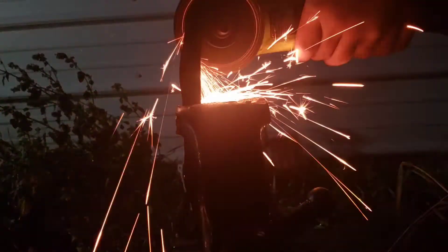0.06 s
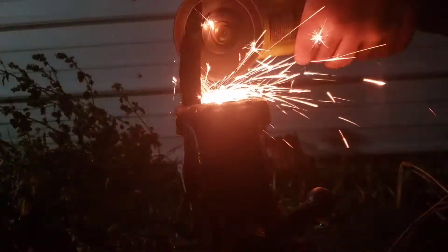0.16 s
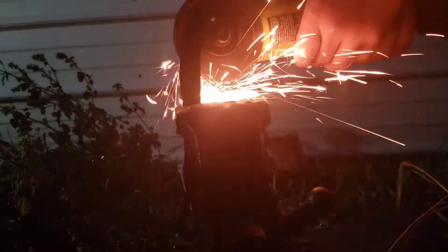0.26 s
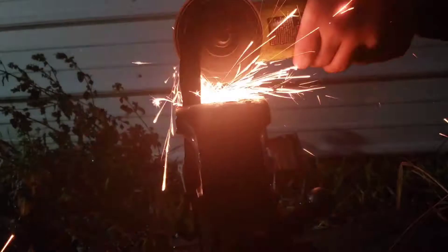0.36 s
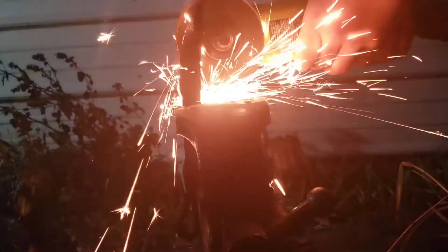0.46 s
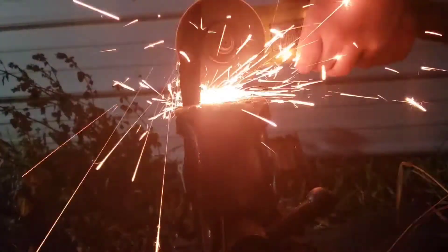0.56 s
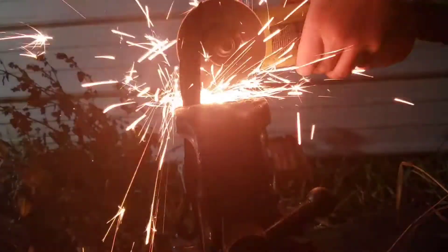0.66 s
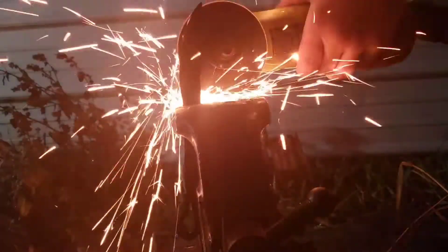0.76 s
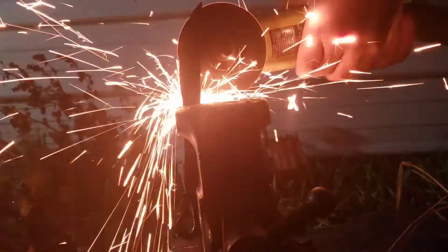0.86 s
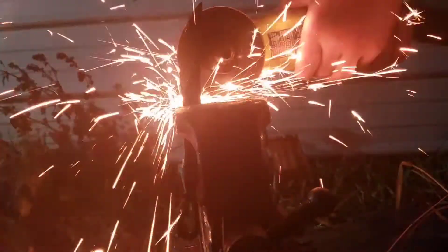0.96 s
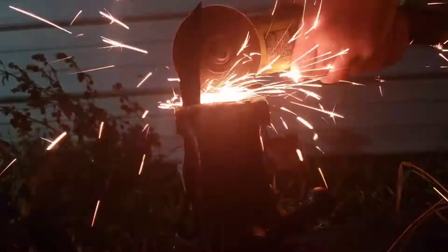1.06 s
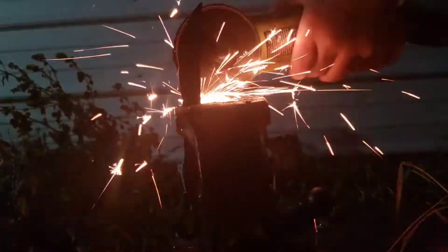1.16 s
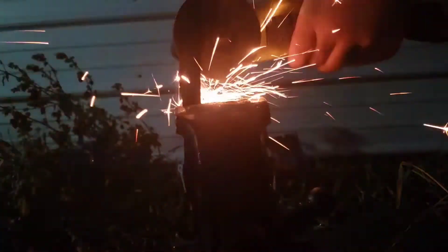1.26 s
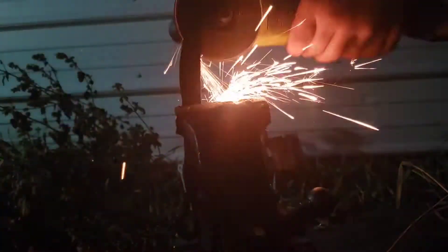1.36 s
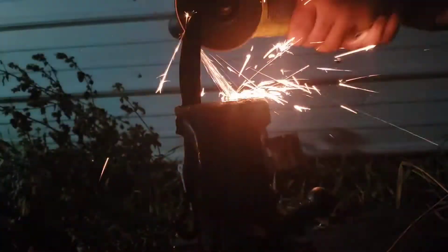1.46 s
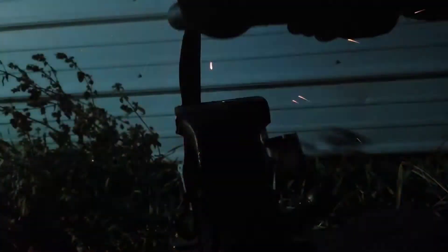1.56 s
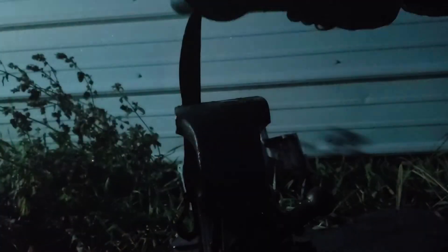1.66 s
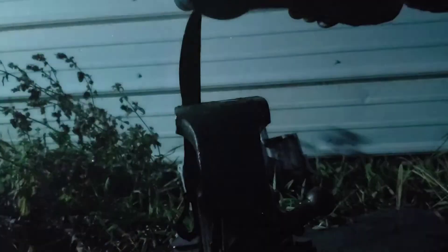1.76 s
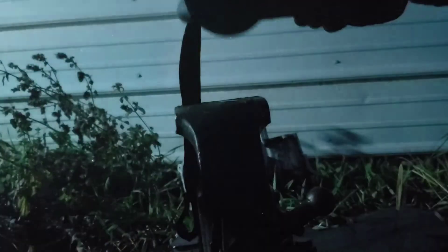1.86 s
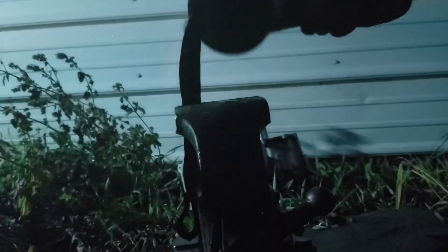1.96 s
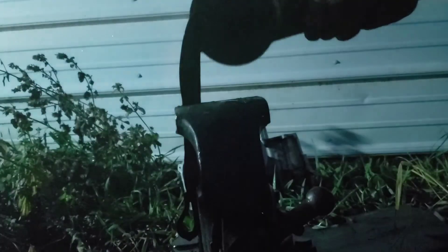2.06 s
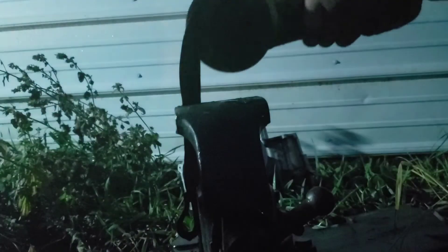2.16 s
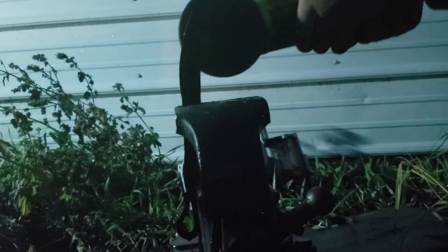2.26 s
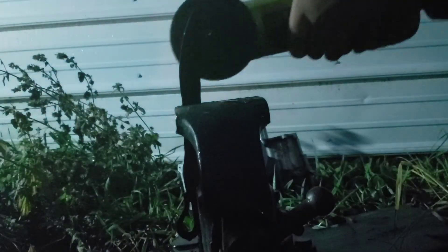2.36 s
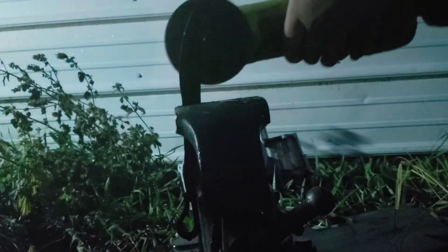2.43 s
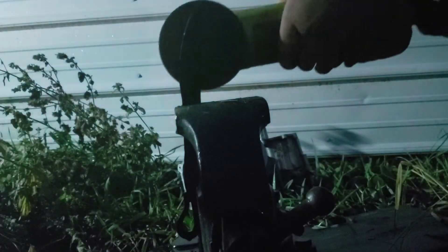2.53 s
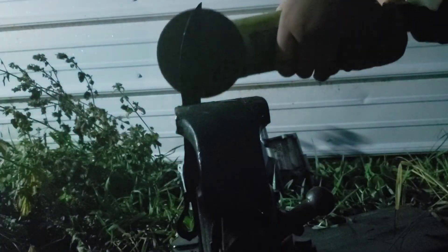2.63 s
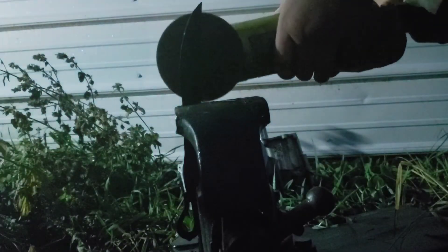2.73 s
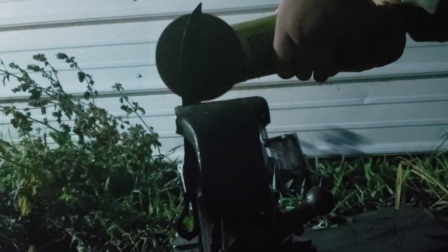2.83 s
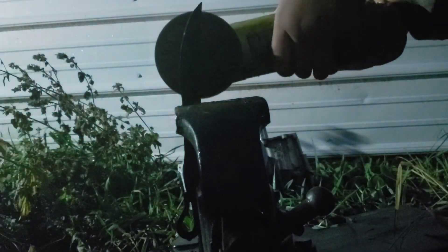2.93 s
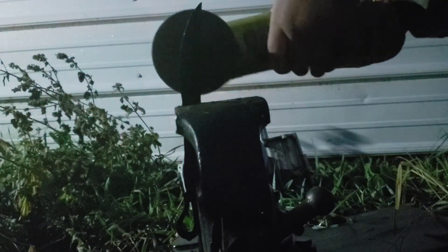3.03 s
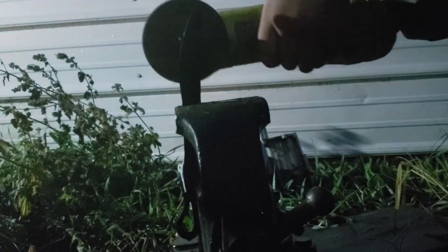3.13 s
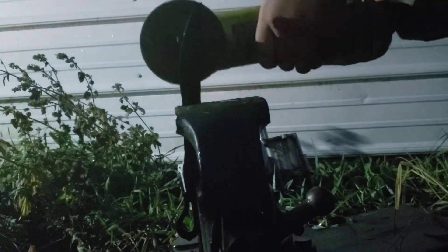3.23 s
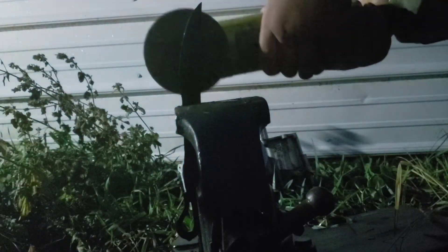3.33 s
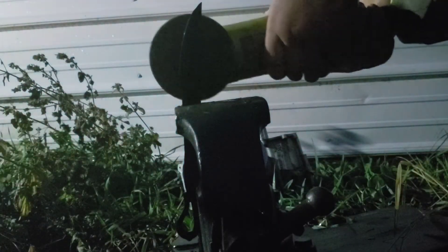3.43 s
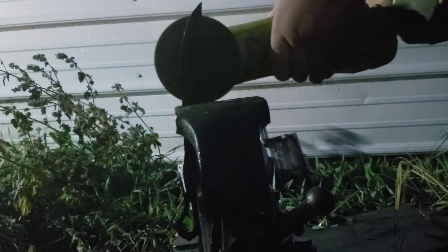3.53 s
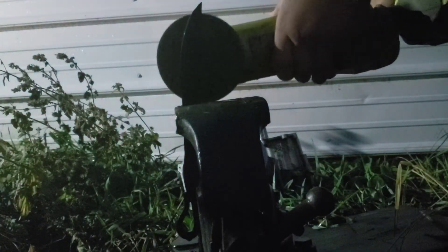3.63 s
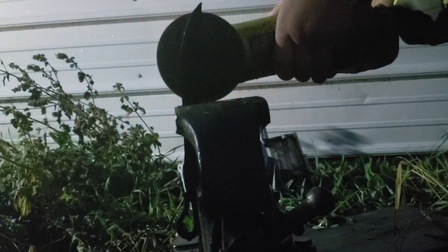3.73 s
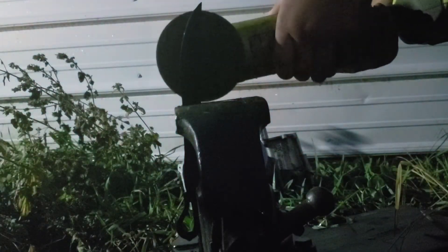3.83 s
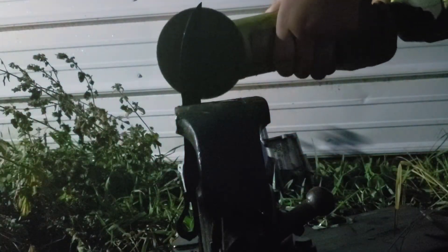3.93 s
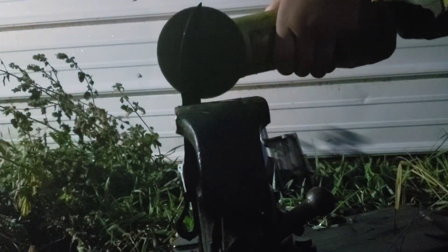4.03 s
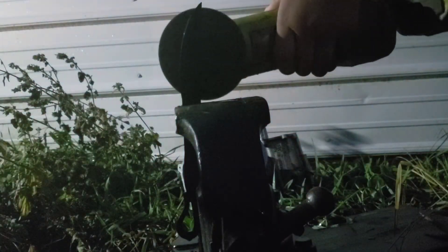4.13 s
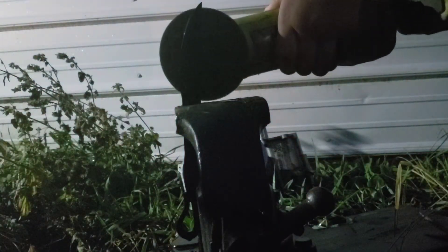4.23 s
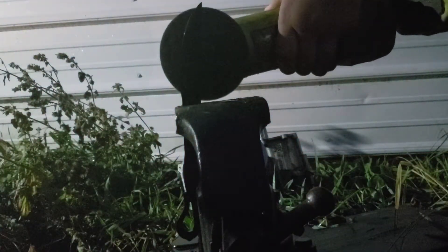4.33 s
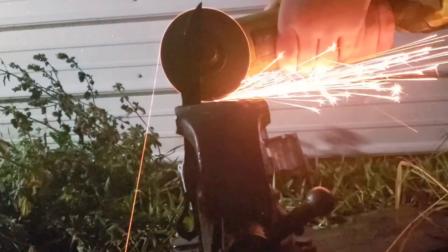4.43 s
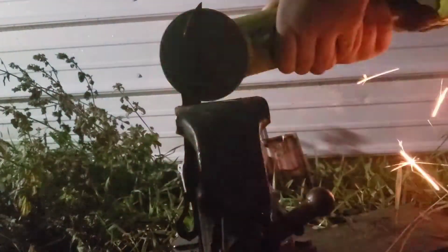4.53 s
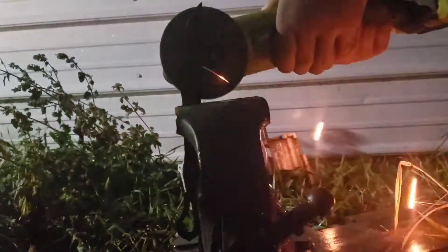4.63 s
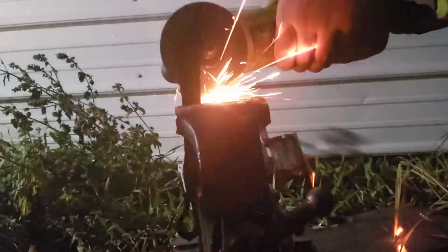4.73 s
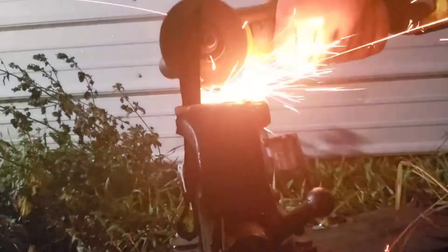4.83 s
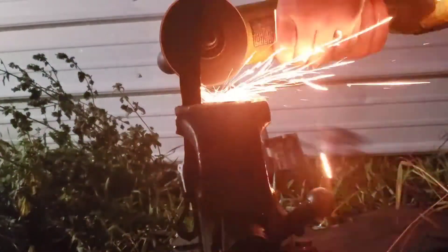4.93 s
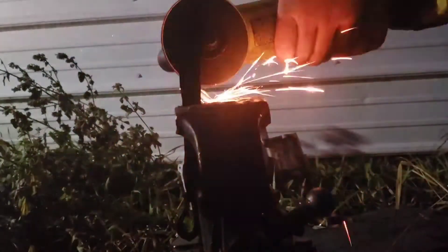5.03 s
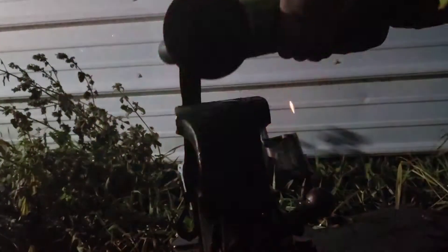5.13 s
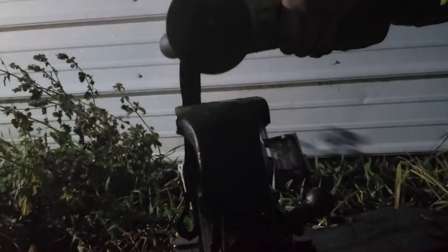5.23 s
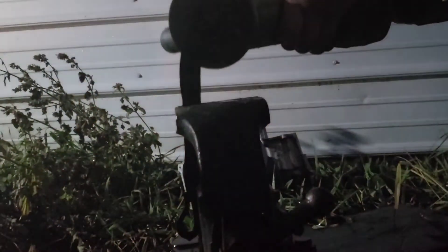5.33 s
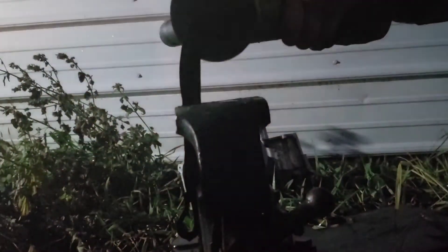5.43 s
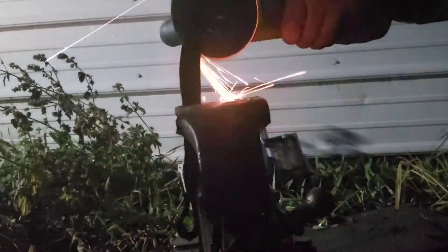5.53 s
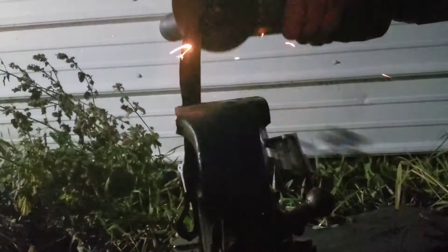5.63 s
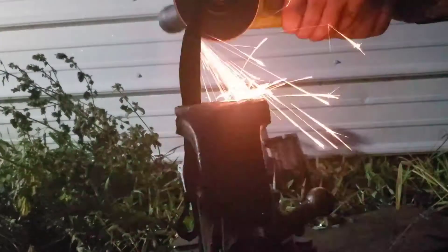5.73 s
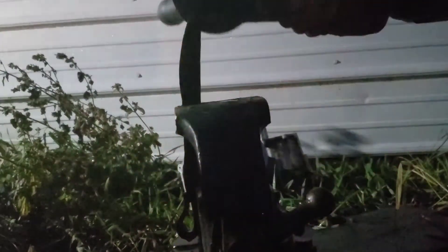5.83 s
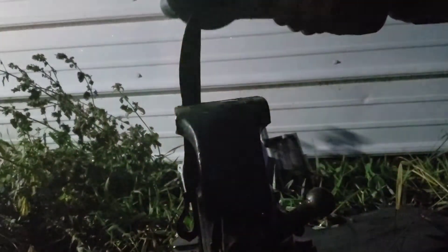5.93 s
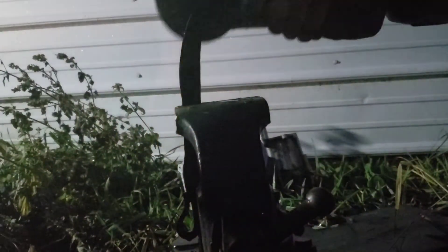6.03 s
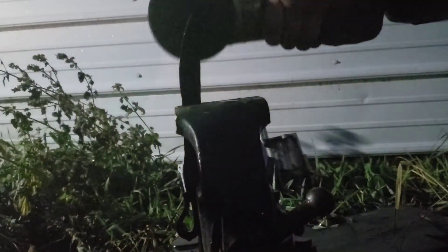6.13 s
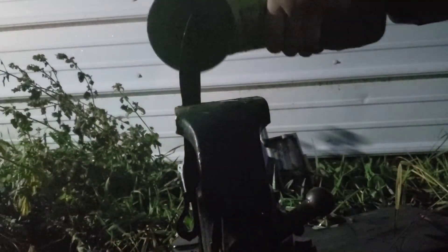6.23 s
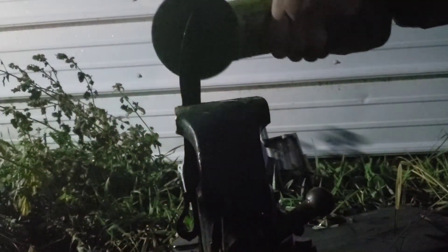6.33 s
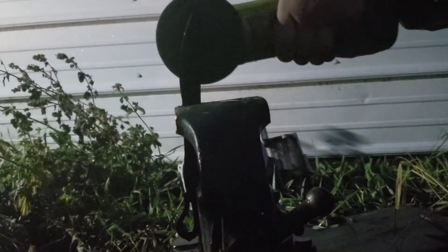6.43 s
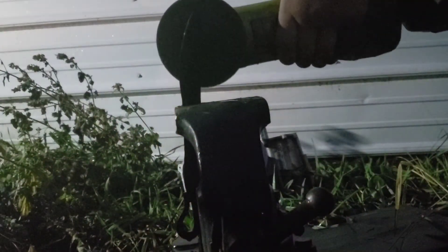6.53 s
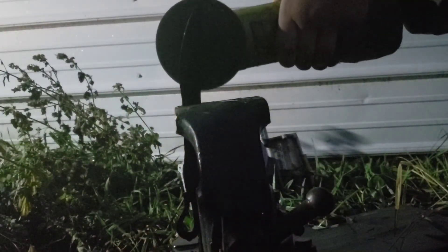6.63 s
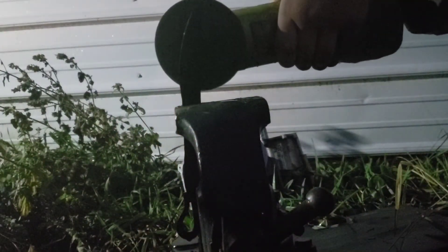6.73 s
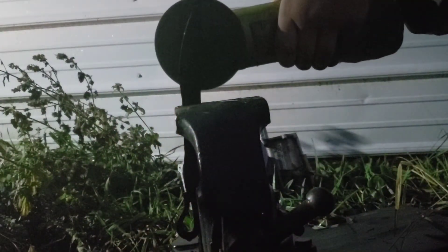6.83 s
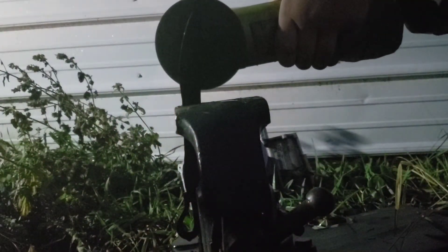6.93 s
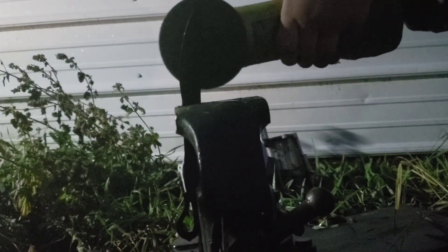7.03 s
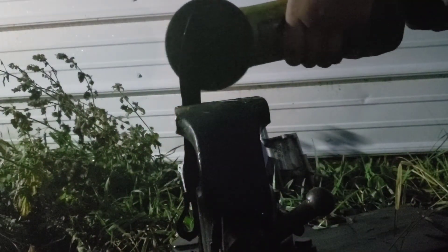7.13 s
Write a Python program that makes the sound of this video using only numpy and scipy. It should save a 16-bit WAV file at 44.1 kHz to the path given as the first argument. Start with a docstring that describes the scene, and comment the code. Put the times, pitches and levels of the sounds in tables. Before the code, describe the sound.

From the very start an angle grinder presses on a clamped steel blade, close by outdoors: a loud, bright, sizzling scrape with gritty fluttering at the disc's fast rotation. From about 0.4 to 1.0 seconds a strained metallic squeal with a lower hum locks in; a rough grab follows, then more scraping and a fainter squeal near 1.4. Contact ends around 1.6. Switched off at 1.7, the motor winds down in a rattling whir with scattered dry gear clacks. At 3.06 it surges quickly back to speed. Low rumble and airy whir swell most around 4.2. Isolated knocks from 3.7 become rough, rapid ringing chatter by 4.3 to 4.7. A second, throbbing grind bites until 5.1, thins into sliding, hissing scrapes, and ends with brief dabs near 5.8. The tool runs free, with two clacks near 6.3, a small knock at 6.6 and faint grazing around 6.7 to 7.1.

```python
"""A harsh, sizzling scrape comes first: an angle grinder's disc bites a steel blade in a vise, outdoors.
Noise shaped by the steel's resonances makes the scrape; grit on the rim repeats part of it each turn.
The disc squeals, lifts, coasts with rattling, clacking gears and is switched on again. It skips and
knocks on the blade, bites again, runs free and grazes the edge. Tones in step with the disc make
squeal and whine; noise makes air, gears, knocks and the low rumble that swells and ebbs beneath."""
import sys
import numpy as np
from scipy import signal
from scipy.fft import rfft, irfft, next_fast_len
from scipy.io import wavfile
from scipy.ndimage import uniform_filter1d, map_coordinates

SR = 44100
rng = np.random.default_rng(int(sys.argv[2]) if len(sys.argv) > 2 else 0)


def file_out(sig):
    """Save sig as 16-bit WAV at sys.argv[1]."""
    # one column per channel
    cols = np.atleast_2d(sig).T
    # limit, then scale
    lim = np.clip(cols, -1, 1)
    pcm = np.round(lim * 32767).astype(np.int16)
    wavfile.write(sys.argv[1], SR, pcm)


N = 317079

# Disc speed under power, dragged down by the load: time_s, turns_per_s
DRIVEN_SPEED = [(0, 86.4), (.2, 86.9), (.95, 86.15), (1.1, 85.3), (1.33, 87.3), (1.45, 87.6), (1.56, 88.8),
                (1.63, 93.2), (3.6, 95), (4.15, 95), (4.72, 92), (4.9, 89.3), (5.1, 89.6), (5.35, 93),
                (5.6, 91.4), (5.95, 94.3), (7.19, 95)]
FREE_SPEED_HZ = 95  # disc turns a second without load
OFF_S, ON_S = 1.72, 3.058  # the switch
# air drag halves the speed in the first time; the other two are fade times of speed gap and strain
COAST_HALF_S, SPIN_UP_S, STRAIN_S = .71, .115, 0.18

# The two firm strokes, levels before the 1 dB cut on both strokes: time_s, sizzle_db, bite_db
FIRST_STROKE = [(0.0, -20.5, -37.5), (0.08, -22.5, -34.5), (0.212, -18.5, -34.5), (0.28, -22.5, -33.5),
                (0.418, -23.5, -33), (0.516, -26.5, -33), (0.948, -26, -30.5), (0.984, -20.5, -30),
                (1.206, -25.5, -34.5), (1.478, -20, -35.5), (1.554, -25.5, -39.5), (1.6, -49, -60)]
SECOND_STROKE = [(4.725, -26, -29.5), (4.8, -25, -28), (4.882, -21, -27.5), (5.01, -26, -29.5),
                 (5.14, -31, -41.5), (5.36, -30, -42), (5.43, -26, -41), (5.52, -29, -45.5),
                 (5.64, -32, -43.5), (5.72, -36, -49), (5.82, -45, -49)]
# Dabs on the edge as the disc lifts away, before the same cut: start_s, end_s, sizzle_db, bite_db
DABS = [(5.56, 5.6, -31, -34), (5.752, 5.774, -27.5, -34)]
DAB_ATTACK_S, DAB_RELEASE_S = 0.031, 0.025
# Broad colour of each stroke's scrape: pitch_hz, level_db
FIRST_TONE = [(350, -66), (600, -39), (930, -19), (1110, -25), (1280, -16), (1600, -26), (2250, -14.5),
              (2830, -18), (4520, -8.5), (5800, -12), (7020, -16), (8050, -10.5), (9760, -11.5),
              (11200, -6.5), (15100, 0), (16000, -3.5)]
SECOND_TONE = [(710, -27), (1200, -19.5), (1380, -11.5), (1700, -19.5), (2110, -15.5), (3660, -11),
               (4000, -6), (6030, -8.5), (6950, -12.5), (7410, -11.5), (10400, -6), (11400, -1),
               (14000, -5), (14800, 2), (16000, -10)]
# Resonances of blade and disc in each stroke: pitch_hz, width_hz, lift_db
FIRST_MODES = [(960, 120, -1), (2140, 210, 6), (3090, 64, 6.5), (4280, 110, 5.5), (7990, 450, 6),
               (11460, 240, 7.5), (12750, 680, 1), (15200, 250, 5.5), (15900, 200, 6)]
SECOND_MODES = [(2020, 170, 6.2), (4080, 100, 4.3), (4830, 180, 7.3), (6770, 250, 4.7), (8300, 500, 4.1),
                (11200, 450, 4.8), (15000, 300, 6.9)]
# Resonances that slide as the contact moves: start_s, end_s, from_hz, to_hz, width_hz, lift_db
STEEL_SLIDES = [(.05, .42, 15000, 15100, 690, 4), (.4, 1.0, 13000, 12700, 1200, 3),
                (1.034, 1.255, 6400, 6500, 700, 6), (5.09, 5.37, 8400, 7900, 600, 12),
                (5.22, 5.42, 15200, 15200, 500, 2), (5.376, 5.557, 11600, 12200, 600, 4),
                (5.4, 5.54, 15000, 14200, 500, -1), (5.56, 5.73, 4560, 4000, 400, 7),
                (5.58, 5.71, 10900, 10600, 500, 7), (5.62, 5.753, 14700, 12600, 700, 13)]
EDGE_DB, EDGE_DAMPED_DB = -6, -6.5  # middle band: offset from mean of bite and sizzle; change in full squeal
FIRM_BITE_DB = -36
STEADY_SHARE, SQUEAL_SHARE = 0.38, 0.14  # part repeating each turn in a firm bite; extra in a full squeal

# Machine loudness as it swells and ebbs: time_s, level_db
MACHINE_SWELL = [(0, -43.5), (1.8, -40), (2.9, -37), (3.5, -34.5), (4.2, -24.5), (4.55, -26), (4.9, -34.5),
                 (5.9, -38), (6.6, -36.5), (7.19, -34)]
# Noises of the machine, one row each: level_db relative to its swell, power of speed, strain_db extra
AIR_LAW = (-12, 1.2, 9.7)
GEAR_LAW = (-9.5, 0.93, 11.2)
HISS_LAW = (-14, 1.82, 3.2)
WHINE_LAW = (-28, 4, 0)
# Colours of cooling air, gears and hiss: pitch_hz, level_db
AIR_TONE = [(250, -28), (430, -24), (464, -11), (550, -9.5), (601, -9), (817, 1.5), (887, 0), (1000, -1),
            (1330, -2.5), (1760, -13.5), (2200, -15), (2860, -44), (4840, -120)]
GEAR_TONE = [(1000, -36), (1700, -12.5), (2480, -4), (2980, -4.5), (4060, -4.5), (4390, -3), (4720, -4.5),
             (5140, -4), (5550, -9), (6110, -15), (6500, -13.5), (8450, -31), (14300, -120)]
HISS_TONE = [(3240, -33), (5500, -18), (7130, -5), (8410, -1), (10700, -7), (11900, -3), (13900, -5),
             (15100, 1.5), (16000, -10)]
# Resonances of the machine's noise that slide in pitch at set times:
# start_s, end_s, from_hz, to_hz, width_hz, lift_db
MACHINE_SLIDES = [(1.948, 3.0, 4250, 4870, 450, 4.5), (2.0, 3.112, 736, 765, 150, 6.6),
                  (2.8, 3.49, 4440, 4400, 400, 7.3), (3.037, 3.345, 2100, 2500, 350, 5.1)]

# Slow swell of the rumble: time_s, level_db
RUMBLE_SWELL = [(0, -38), (.3, -41), (1.8, -40.5), (2.6, -40), (3.0, -33), (3.85, -32), (4.1, -25),
                (4.4, -26.5), (4.7, -28), (4.8, -37.5), (5.9, -37.5), (6.7, -36.5), (7.19, -33)]
# Colour of the rumble: pitch_hz, level_db
RUMBLE_TONE = [(13, -58), (22, -27), (59, -18), (83, -4.5), (114, 1.5), (183, -4.5), (231, 1), (365, -9),
               (437, -25.5), (508, -25), (552, -19.5), (600, -26.5), (780, -41), (1320, -120)]

# Times when disc and blade lock together: start_s, end_s, squeal_db, hum_db
SQUEALS = [(.53, 0.954, -34.5, -45), (1.305, 1.486, -50, -46.5)]
# Tones of the squeal and of the hum below it: multiple of disc speed, level_db
SQUEAL_LINES = [(23, -13), (25, -.3), (28, -13), (30, -8), (45, -10), (48, 2), (49, -9), (53, -7), (54, -4),
                (56, -10)]
HUM_LINES = [(8, -11), (9, -9), (10, -5), (11, 1), (14, -4), (16, -3), (17, -7)]
SQUEAL_ATTACK_S, SQUEAL_RELEASE_S = 0.16, 0.11

# Brief rough grabs and loose, chattering touches:
# start_s, end_s, scrape_db, blade_ring_db, rim_zing_db, body_db
GRAZES = [(1.01, 1.034, -48, -52, -39, -38.5), (4.006, 4.215, -53, -53, -52, -46),
          (4.269, 4.422, -29.5, -46, -30, -36), (4.45, 4.72, -31, -36, -37, -37),
          (6.68, 7.12, -54, -58, -48, -59), (6.896, 7.01, -54, -46, -44, -58)]
GRAZE_ATTACK_S, GRAZE_RELEASE_S = 0.032, 0.061
# Knocks of disc on blade: time_s, scrape_db, then relative to it blade_ring_db, body_db
KNOCKS = [(3.6628, -33, -14, 6), (3.828, -23.5, -6, -0.5), (4.0043, -39.5, 11, -1),
          (4.2363, -17.5, -17, -12), (4.298, -33, -8, 1), (4.4079, -26, -3, -18), (4.4358, -26, 11, -19),
          (4.4563, -24, 1, -23), (4.4817, -27, 3, -21), (4.5024, -22, -4, -8), (6.5894, -39.5, -9, -2)]
KNOCK_ZING_DB = 4  # rim zing in every knock, relative to its scrape
BOUNCE_FROM_S, BOUNCE_TO_S = 4.489, 4.715
# scrape, then ring and body relative to it, and the random spread of scrape and ring
BOUNCE_DB, BOUNCE_RING_DB, BOUNCE_BODY_DB, BOUNCE_SCATTER_DB = -22.5, 4.5, -17, 1.5
# Colours of grazing scrape, blade ring, rim zing and knock body: pitch_hz, level_db
GRAZE_TONE = [(1000, -34), (4500, -4.5), (6200, -3.5), (7100, -12), (8300, -2), (9500, -6.5), (11000, -6.5),
              (12600, -11), (14000, -3), (15800, -14.5)]
RING_TONE = [(9500, -55), (10900, -33), (11230, 10), (11650, 0), (12100, -9), (14000, -50)]
ZING_TONE = [(11000, -21), (13500, -11), (14050, -7), (14300, -4), (14600, -8), (15040, 3), (15350, -10),
             (15800, -7.5)]
KNOCK_TONE = [(400, -18), (900, -2.5), (2200, -3), (5000, -3.5), (7000, -21)]
# Resonances in the scrape of grazes and knocks: pitch_hz, width_hz, lift_db
GRAZE_MODES = [(5080, 150, 11), (6020, 82, 8), (6510, 110, 17), (7820, 370, 14), (10430, 250, 16),
               (14200, 200, 4.5), (15030, 330, 13)]

# Slack gears clack and take up the drive: time_s, peak_db
CLACKS = [(1.7254, -42), (1.8444, -35), (1.8813, -34), (2.1704, -42), (2.2174, -42), (2.247, -31.5),
          (2.2636, -35), (2.39, -36), (2.6499, -34), (2.8418, -33.5), (2.908, -34.5), (3.057, -37),
          (6.2344, -29), (6.312, -33)]
# Colour of the clacks: pitch_hz, level_db
CLACK_TONE = [(500, -12), (900, -11), (1700, -14), (4400, 5.5), (7000, -0.5), (10500, -9), (13000, 0),
              (16000, -11)]

# Likeness of left and right: pitch_hz, likeness (1 is the same, negative is opposed)
STEEL_ALIKE = [(700, 1), (2200, 1), (4500, 0.17), (8000, 0.55), (15000, 0.25)]
MACHINE_ALIKE = [(60, 0.94), (130, 0.97), (290, -0.85), (640, 0.92), (1410, 0.79), (3100, -0.16),
                 (6820, 0.68), (15000, 0.38)]
RUMBLE_ALIKE = [(30, .88), (70, 0.98), (150, 1), (400, 0.87)]
# Level of left over right; the first serves steel and rumble: pitch_hz, difference_db
STEEL_TILT = [(100, 0.5), (700, -0.8), (2400, 0.5), (4400, -3.5), (8100, -7), (11300, -2), (15000, 2)]
MACHINE_TILT = [(60, 1.5), (150, 1.0), (380, 0.5), (950, 0.5), (2380, 0.5), (5980, -7.5), (15000, 0.5)]
# How far left leads right; the second serves machine and rumble: pitch_hz, lead_radians
STEEL_LEAD = [(100, 0), (900, -.25), (2600, -.5), (4400, .9), (7000, 3), (8400, 4.5), (11700, 5),
              (14000, 4.5), (15200, 7.5)]
MACHINE_LEAD = [(100, 0.098), (600, 0.59), (2000, -.3), (4400, -0.58), (8000, -1.7)]
CEILING, TOP_HZ = .95, 15850  # peak limit before the treble cut; highest pitch kept


def amp(db):
    """Turn decibels into gain."""
    return 10 ** (np.asarray(db) / 20)


def unit(x):
    """Scale to an rms (average strength) of 1."""
    return x / np.sqrt(np.mean(x ** 2) + 1e-20)


def along(points, hz):
    """Join (pitch, value) points on a logarithmic pitch axis."""
    pitch, value = np.transpose(points)
    return np.interp(np.log(hz + 1), np.log(pitch + 1), value)


def curves(rows):
    """Give one value per sample for each column after the time."""
    times, *columns = np.transpose(rows)
    return [np.interp(np.arange(N) / SR, times, column) for column in columns]


def held(start, end, attack, release):
    """A gain that rises to 1 by the start, holds and falls after the end."""
    t = np.arange(N) / SR
    return np.clip(1 + np.minimum((t - start) / attack, (end - t) / release), 0, 1)


def during(rows):
    """1 within the times of a table, fading quickly outside."""
    return held(rows[0][0], rows[-1][0], attack=.015, release=.015)


def wobble(rate):
    """A smooth random curve with the given number of knots a second."""
    knots = rng.standard_normal(int(N * rate / SR) + 4)
    at = np.arange(0, len(knots) - 1, .125)
    smooth = map_coordinates(knots, [at])
    return np.interp(np.arange(N) * rate / SR, at, smooth)


def noise():
    """Two unrelated white noises: direct and scattered sound."""
    return rng.standard_normal((2, N))


def filtered(x, response):
    """Multiply the spectrum of x by a response of frequency."""
    size = next_fast_len(N + 8192, True)
    hz = np.fft.rfftfreq(size, 1 / SR)
    return irfft(rfft(x, size) * response(hz), size)[..., :N]


def coloured(x, tone, modes=()):
    """Shape x by a broad spectrum with resonant lifts; white noise keeps its power."""
    def response(hz):
        lifts = sum(db / (1 + (2 * (hz - centre) / width) ** 2) for centre, width, db in modes)
        return unit(amp(along(tone, hz) + lifts))
    return filtered(x, response)


def once_a_turn(turns, depth_db):
    """A gain of rms 1 with a sharp peak each turn, or a dip if the depth is negative."""
    return unit(amp(depth_db * np.cos(np.pi * turns) ** 4))


def shifting(x, slides, patchy_db):
    """Let some resonances slide in pitch while others come and go at random."""
    hz, t, spectrum = signal.stft(x, SR, nperseg=512)
    patches = rng.standard_normal(spectrum.shape[1:])
    patches = uniform_filter1d(patches, size=2, axis=0)  # neighbouring pitches
    patches = uniform_filter1d(patches, size=26, axis=1)  # neighbouring times
    db = patchy_db * unit(patches)
    for start, end, from_hz, to_hz, width, lift in slides:
        progress = np.clip((t - start) / (end - start), 0, 1)
        centre = from_hz + (to_hz - from_hz) * progress
        offset = (hz[:, None] - centre) / width
        rise_and_fall = np.sqrt(np.abs(np.sin(np.pi * progress)))
        db += lift * rise_and_fall / (1 + (2 * offset) ** 2)
    return signal.istft(spectrum * amp(db), SR, nperseg=512)[1][:, :N]


def ports(pair, alike, tilt, lead):
    """Mix direct and scattered sound into left and right, keeping the level of their sum."""
    def mixing(hz):
        likeness = np.clip(along(alike, hz), -.9, .995)
        left = amp(along(tilt, hz) / 2) * np.exp(.5j * along(lead, hz))
        direct = np.sqrt((1 + likeness) / 2)
        scattered = np.sqrt((1 - likeness) / 2)
        paths = np.array([[left * direct, left * scattered], [direct / left, -scattered / left]])
        return paths / np.linalg.norm(paths.mean(axis=0), axis=0)
    return filtered(pair, mixing).sum(axis=1)


def motor():
    """Disc speed and motor strain: off, it coasts against air drag; on, it strains back up."""
    t = np.arange(N) / SR
    coasting = 1 / (1 + np.clip(t - OFF_S, 0, ON_S - OFF_S) / COAST_HALF_S)
    since_on = np.maximum(t - ON_S, 0)
    speed_gap = (1 - coasting) * np.exp(-since_on / SPIN_UP_S)
    speed = curves(DRIVEN_SPEED)[0] * (1 - speed_gap)
    strain = (t >= ON_S) * np.exp(-since_on / STRAIN_S)
    return speed, strain


def grit(turns, count=180, size=8192):
    """The rough rim of the disc, whose same bumps pass again with every turn."""
    lines = np.exp(2j * np.pi * rng.random((2, count)))
    rims = irfft(np.pad(lines, ((0, 0), (1, 0))), size)
    around = np.arange(size) / size
    return unit(np.array([np.interp(turns % 1, around, rim) for rim in rims]))


def pressure(rows):
    """Levels of sizzle and bite along a stroke, with the power of the dabs added."""
    power = amp(curves(rows)) ** 2
    for start, end, *levels_db in DABS:
        dab = amp(levels_db)[:, None] * held(start, end, DAB_ATTACK_S, DAB_RELEASE_S)
        power = power + dab ** 2
    return 10 * np.log10(power)


def squealing():
    """Strengths of squeal and hum: they build, hold and let go together."""
    return sum(amp([[squeal_db], [hum_db]]) * held(start, end, SQUEAL_ATTACK_S, SQUEAL_RELEASE_S)
               for start, end, squeal_db, hum_db in SQUEALS)


def stroke(turns, rows, tone, modes, throb_db, spark_db, tremor_db):
    """The pressed disc scrapes its grit through the steel's resonances; breaking grains sizzle."""
    sizzle_db, bite_db = pressure(rows)
    squeal_gain = squealing()[0]
    locked = squeal_gain / squeal_gain.max()
    edge_db = (sizzle_db + bite_db) / 2 + EDGE_DB + EDGE_DAMPED_DB * locked
    firmness = np.minimum(amp(bite_db - FIRM_BITE_DB), 1)
    steady = np.clip(STEADY_SHARE * firmness + SQUEAL_SHARE * locked, 0, 1)
    scrape = np.sqrt(steady) * grit(turns) + np.sqrt(1 - steady) * noise()
    # the disc runs slightly out of true and bears hardest once a turn
    throb = once_a_turn(turns, throb_db * np.sqrt(steady))
    throb /= np.sqrt(uniform_filter1d(throb ** 2, size=2000))  # keep only the quick throb
    body = coloured(scrape * throb ** 1.05, tone, modes)
    sparks = throb * amp(spark_db * wobble(1800) + 0.66 * wobble(70))
    fine = coloured((scrape + 0.57 * noise()) * sparks, tone, modes)

    def below(hz, corner):
        """Keep the pitches below a steep corner."""
        return 1 / (1 + (hz / corner) ** 16)
    bite = unit(filtered(body, lambda hz: below(hz, 6540)))
    edge = unit(filtered(fine, lambda hz: (1 - below(hz, 6550)) * below(hz, 10130)))
    sizzle = unit(filtered(fine, lambda hz: (1 - below(hz, 9960)) ** 2))
    # a squeal draws its power from the bite
    spare = np.sqrt(np.clip(1 - (squeal_gain / amp(bite_db)) ** 2, .45, 1))
    hand = during(rows) * amp(tremor_db * wobble(22))
    return hand * (spare * amp(bite_db) * bite + amp(edge_db) * edge + amp(sizzle_db) * sizzle)


def machine(turns, speed, strain):
    """Air, gears, hiss and whine grow with speed; the hiss clatters most when gears are slow and slack."""
    swell_db = curves(MACHINE_SWELL)[0]
    speed_db = 20 * np.log10(speed / FREE_SPEED_HZ)

    def level_db(db, power, strain_db):
        """Level of one noise from swell, speed and strain."""
        return swell_db + db + power * speed_db + strain_db * strain
    slack = np.clip((FREE_SPEED_HZ - speed) / 35, 0, 1)
    shake_db = 0.7 * wobble(28)
    turn_beat = once_a_turn(turns, depth_db=-2.5)
    half_turn_beat = once_a_turn(2 * turns, depth_db=4)
    rattle = turn_beat * half_turn_beat * amp(2.45 * wobble(250))
    swing_db = 1.2 * np.cos(2 * np.pi * turns) + 2 * np.cos(4 * np.pi * turns)
    clatter = amp(slack * (1.9 * wobble(60) + swing_db + 6.5))
    air = amp(level_db(*AIR_LAW) + 1.3 * wobble(40)) * coloured(noise(), AIR_TONE, [(734, 230, 2.7)])
    gears = amp(level_db(*GEAR_LAW) + shake_db) * unit(rattle) * coloured(noise(), GEAR_TONE)
    hiss_gain = amp(level_db(*HISS_LAW) + shake_db + 1.55 * wobble(300))
    hiss = hiss_gain * clatter * coloured(noise(), HISS_TONE)
    slots = 72 * turns  # 24 armature slots, geared down 3 to 1
    whine_gain = amp(level_db(*WHINE_LAW) + 1.8 * wobble(35))
    whine = whine_gain * np.sin(2 * np.pi * slots + .4 * wobble(50))
    return air + gears + hiss + whine


def rumble():
    """Dull low noise whose level swells and ebbs restlessly."""
    level_db = curves(RUMBLE_SWELL)[0] + 1.5 * wobble(18)
    return amp(level_db) * coloured(noise(), RUMBLE_TONE)


def partials(turns, lines, waver_db, waver_rad, drift_rad):
    """Tones in step with the turning, together of rms 1; each wavers and drifts a little."""
    total = np.zeros(N)
    for order, db in lines:
        gain = amp(db + waver_db * wobble(13.9))
        start = rng.random()
        drift = waver_rad * wobble(34.35) + drift_rad * wobble(4.7)
        total += gain * np.sin(2 * np.pi * (order * turns + start) + drift)
    return unit(total)


def squeal(turns):
    """Blade and disc vibrate in step with the turning: a squeal over a lower hum."""
    squeal_gain, hum_gain = squealing()
    high = squeal_gain * partials(turns, SQUEAL_LINES, waver_db=0.5, waver_rad=0.55, drift_rad=0.81)
    low = hum_gain * partials(turns, HUM_LINES, waver_db=3.0, waver_rad=0.49, drift_rad=0.54)
    return (high + low) * np.array([[1], [0]])  # direct sound only


def bounces(turns):
    """The bouncing disc knocks once in every second turn; rows are like those of KNOCKS."""
    t = np.arange(N) / SR
    first, last = np.interp([BOUNCE_FROM_S, BOUNCE_TO_S], t, turns)
    times = np.interp(np.arange(first, last, 2), turns, t)
    scatter = BOUNCE_SCATTER_DB * rng.standard_normal((len(times), 2))
    return [(s, BOUNCE_DB + scrape_db, BOUNCE_RING_DB + ring_db, BOUNCE_BODY_DB)
            for s, (scrape_db, ring_db) in zip(times, scatter)]


def skipping(turns, rise=0.00097, decay=0.0034):
    """The disc grabs or chatters, strongest every second turn, and knocks so that the blade rings."""
    scrape, ring, zing, body = np.zeros((4, N))
    chatter = once_a_turn(turns / 2, depth_db=4.5) * once_a_turn(turns, depth_db=-1.5)
    chatter = chatter * amp(1.5 * wobble(90))
    for start, end, scrape_db, ring_db, zing_db, body_db in GRAZES:
        touch = held(start, end, GRAZE_ATTACK_S, GRAZE_RELEASE_S) ** 2 * chatter
        scrape += touch * amp(scrape_db)
        ring += touch * amp(ring_db)
        zing += touch * amp(zing_db)
        body += touch * amp(body_db)
    t = np.arange(SR // 20) / SR
    contact = (1 - np.exp(-t / rise)) * np.exp(-t / decay)
    contact /= contact.max()
    for s, db, ring_db, body_db in list(KNOCKS) + bounces(turns):
        start = round((s - rise) * SR)
        at = slice(start, start + len(t))
        scrape[at] += amp(db) * contact
        ring[at] += amp(db + ring_db) * contact
        zing[at] += amp(db + KNOCK_ZING_DB) * contact
        body[at] += amp(db + body_db) * contact
    grains = unit(amp(2.2 * wobble(2000)))
    scrape_sound = coloured(scrape * grains * noise(), GRAZE_TONE, GRAZE_MODES)
    ring_sound = coloured(ring * noise(), RING_TONE)
    zing_sound = coloured(zing * grains * noise(), ZING_TONE)
    body_sound = coloured(body * noise(), KNOCK_TONE)
    return scrape_sound + ring_sound + zing_sound + body_sound


def clacks(decay=0.0034):
    """Short dry knocks of the gear teeth: bursts of noise that die away at once."""
    blows = np.zeros(N)
    t = np.arange(SR // 30) / SR
    for s, peak_db in CLACKS:
        gain = amp(peak_db - 8.5)  # noise peaks rise above its average
        blows[round(s * SR):][:len(t)] += gain * np.exp(-t / decay)
    return coloured(blows * noise(), CLACK_TONE)


def scene():
    """The turning disc drives the machine and the contacts with the blade, over the rumble."""
    speed, strain = motor()
    turns = np.cumsum(speed) / SR
    first = stroke(turns, FIRST_STROKE, FIRST_TONE, FIRST_MODES, throb_db=3, spark_db=2.0, tremor_db=.5)
    second = stroke(turns, SECOND_STROKE, SECOND_TONE, SECOND_MODES, throb_db=8, spark_db=1.5, tremor_db=.5)
    strokes = amp(-1) * shifting(first + second, STEEL_SLIDES, patchy_db=3.5)
    running = amp(-0.6) * shifting(machine(turns, speed, strain), MACHINE_SLIDES, patchy_db=1.9)
    steel = strokes + squeal(turns) + skipping(turns)
    tool = running + clacks()
    return (ports(steel, STEEL_ALIKE, STEEL_TILT, STEEL_LEAD)
            + ports(tool, MACHINE_ALIKE, MACHINE_TILT, MACHINE_LEAD)
            + ports(rumble(), RUMBLE_ALIKE, STEEL_TILT, MACHINE_LEAD))


def record(dry):
    """Round off the highest peaks, then keep nothing above the top pitch."""
    rounded = dry / (1 + (dry / CEILING) ** 6) ** (1 / 6)
    return filtered(rounded, lambda hz: hz < TOP_HZ)


dry = scene()
out = record(dry)
file_out(out)
```